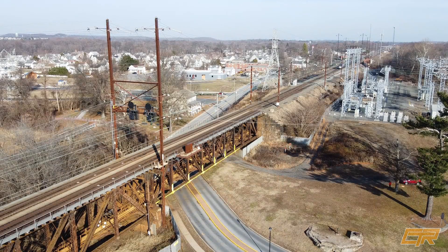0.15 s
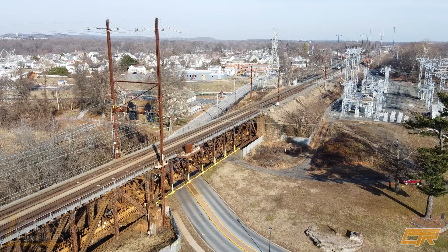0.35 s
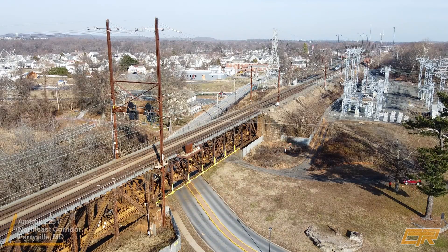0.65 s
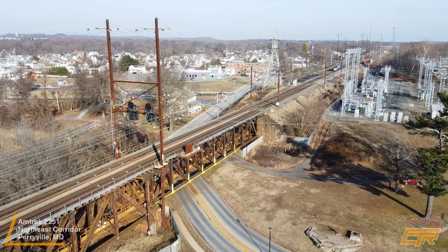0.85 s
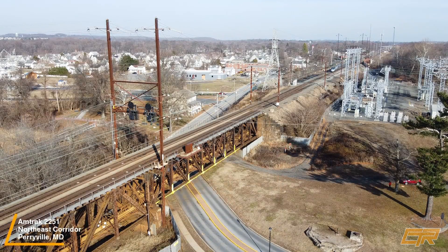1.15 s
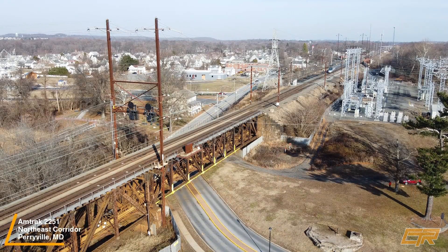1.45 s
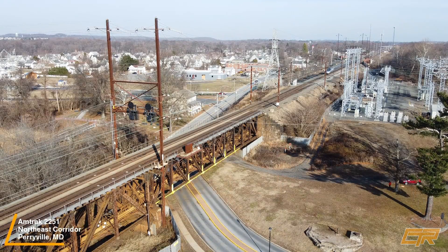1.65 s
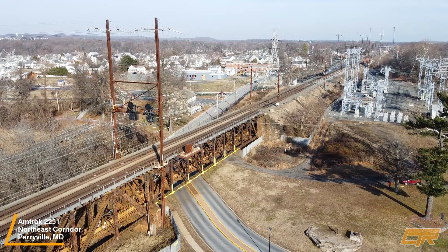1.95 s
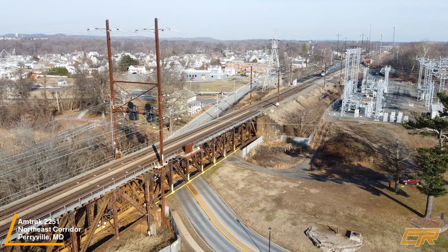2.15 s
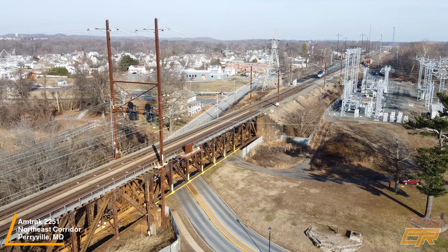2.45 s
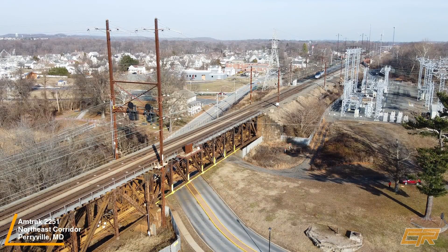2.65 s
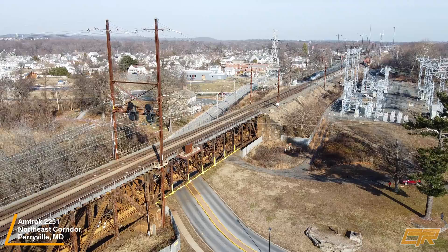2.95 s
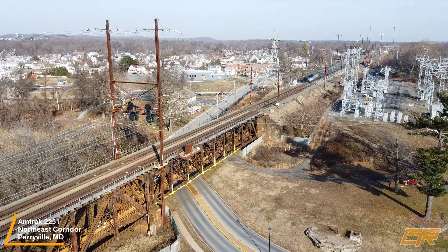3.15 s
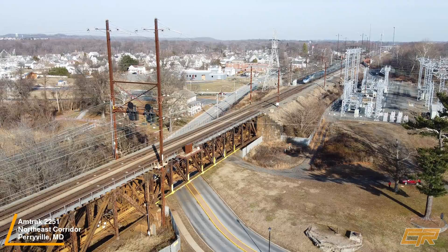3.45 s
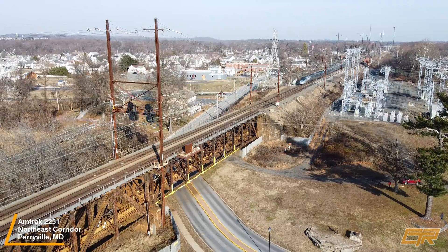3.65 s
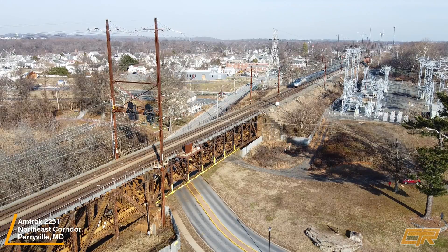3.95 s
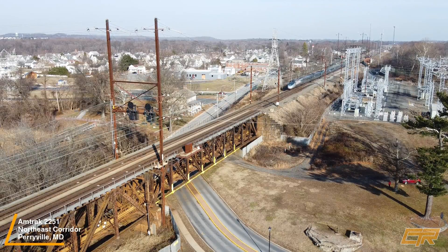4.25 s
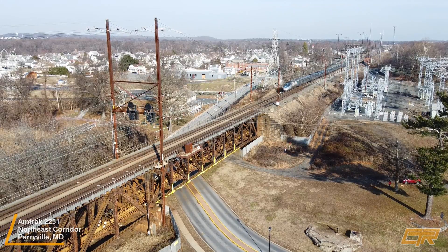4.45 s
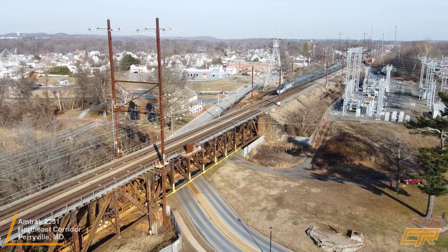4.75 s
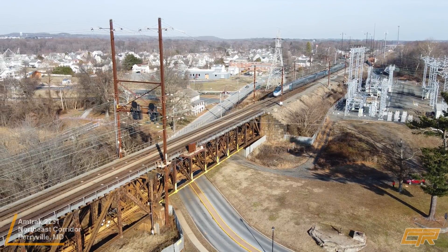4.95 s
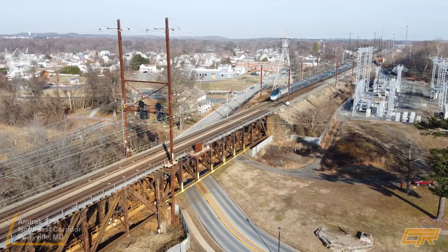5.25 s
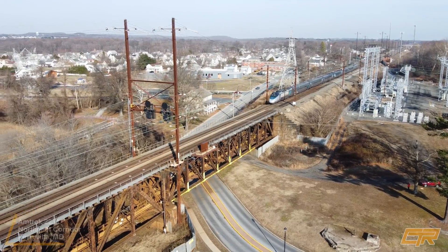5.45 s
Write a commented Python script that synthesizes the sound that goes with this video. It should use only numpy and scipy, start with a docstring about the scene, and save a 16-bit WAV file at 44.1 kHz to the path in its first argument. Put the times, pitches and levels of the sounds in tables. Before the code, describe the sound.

A stereo outdoor scene of about 5.6 seconds beside a steel railway bridge. It starts quietly with broadband town noise, a faint steady hum, low uneven wind buffeting and faint rail rush. Tiny gliding chirps scatter through the first three seconds; thin, fast-trilled whistles stand out at 0.7-1.0 and 2.8-3.0, with faint echoes. A distant lorry engine rises in pitch from about 1 to 2.5 seconds, drops with a gear change near 3, then pulls again around 3.6. Dry, dull knocks with a thin crack come from the left at 2.0-2.1. The train's rolling roar swells throughout, becoming louder and brighter. From about 3.6 the bridge begins drumming deeply, with irregular soft, low thuds from 3.9 onward, left of centre. A faint gear whine sits inside the rush. From 4.6 the power car's heavy low-mid roar joins, surging sharply at the end without passing or fading.

```python
"""Beside a steel railway bridge, below a stereo microphone: a fast train nears from the right and rolls on.
Wheels and rails roar as coloured noise, brighter as less air lies between; girders drum and thud
under the axles, dry knocks come from the track side, and the power car's noise closes in last.
Wind rumbles as low noise, a lorry engine revs far off in gliding orders,
small birds call in trilled and gliding whistles over the noise and hum of a town."""
import sys
import numpy as np
from scipy import signal
from scipy.fft import rfft, irfft, next_fast_len
from scipy.io import wavfile
from scipy.ndimage import uniform_filter1d, map_coordinates

SR = 44100
rng = np.random.default_rng(int(sys.argv[2]) if len(sys.argv) > 2 else 0)


def inscribe(sig):
    """Save sig as 16-bit PCM at rate SR to the path in sys.argv[1].

    A 1-D sig is mono; a 2-D sig holds one channel per row.
    Samples are clipped to [-1, 1] before scaling.
    """
    pcm = np.round(np.clip(np.atleast_2d(sig).T, -1, 1) * 32767)
    wavfile.write(sys.argv[1], SR, pcm.astype(np.int16))


N = 246519


def undb(db):
    """Decibels to gain."""
    return 10 ** (np.asarray(db) / 20)


def pan_gains(pan_db):
    """Left and right gains for a left-minus-right level difference."""
    return undb([[pan_db / 2], [-pan_db / 2]])


def along(table):
    """Columns of a curve table at every sample."""
    knots_s, *columns = np.transpose(table)
    return [np.interp(np.arange(N) / SR, knots_s, column) for column in columns]


def rise(at_s, width_s):
    """A smooth step from 0 to 1."""
    return .5 + .5 * np.tanh((np.arange(N) / SR - at_s) / width_s)


def waver(rate_hz):
    """Random wandering of spread 1, smoothed twice over 1 / rate_hz."""
    width = int(SR / rate_hz)
    x = uniform_filter1d(uniform_filter1d(rng.standard_normal(N), width), width)
    return x / x.std()


def noise(colour):
    """Two-channel noise of a given colour, side and likeness; the mean of both has rms 1."""
    size = next_fast_len(N)
    log_hz = np.log(np.fft.rfftfreq(size, 1 / SR) + 1)
    knots_hz, *columns = np.transpose(colour)
    db, pan_db, like, lead_rad = (np.interp(log_hz, np.log(knots_hz), column) for column in columns)
    like = np.clip(like, 0, 1)
    shared, other = rfft(rng.standard_normal((2, size)))
    right = like * np.exp(-1j * lead_rad) * shared + np.sqrt(1 - like ** 2) * other
    spectra = np.array([shared * undb(db + pan_db / 2), right * undb(db - pan_db / 2)])
    x = irfft(spectra, size)[:, :N]
    return x / np.std(x.mean(axis=0))


def through_air(x, loss_db, flicker_db, steep):
    """Treble dies with distance; eddies make neighbouring bands flicker together."""
    hz, frame_s, bins = signal.stft(x, SR, nperseg=512)
    air = (hz[:, None] / 5000) ** steep
    # at grazing angles the ground's echo cancels the low middle
    ground = 0.4 * np.exp(-(np.log2((hz[:, None] + 1) / 500) / 0.63) ** 2)
    loss = np.interp(frame_s, np.arange(N) / SR, loss_db) * (air + ground)

    eddies = rng.standard_normal((8, len(frame_s)))
    eddies = uniform_filter1d(uniform_filter1d(eddies, size=8), size=2, axis=0)
    octave = np.clip(np.log2(hz / 125 + 1), 0, 7)
    grid = np.meshgrid(octave, np.arange(len(frame_s)), indexing="ij")
    eddies = map_coordinates(eddies / eddies.std(), grid, order=1)
    return signal.istft(bins * undb(flicker_db * eddies - loss), SR, nperseg=512)[1][:, :N]


def add(out, at_s, x, pan_db):
    """Mix a short sound in at a given time."""
    i = int(at_s * SR)
    x = x[:N - i]
    out[:, i:i + len(x)] += x * pan_gains(pan_db)


def town():
    """Flickering broadband noise of a town, with a steady-pitched hum of wavering level."""
    # town noise: (frequency [Hz], level [dB], left minus right [dB], likeness [0-1], left lead [rad])
    town_colour = [(40, -4.5, -3, 0.73, -0.34), (100, -11, 0.5, 0.66, -0.045), (199, -18, -2, 0.39, -0.49),
                   (413, -21.5, 3, 0.21, -0.34), (730, -30.5, 9.5, 0.23, -.1), (1060, -20.5, -3, 0.43, -.1),
                   (1220, -28, -1, 0.23, -.1), (1940, -25, -7, 0.14, -0.056), (3240, -44.5, -1, 0.16, -.2),
                   (5200, -56.5, 6, 0.16, -.3), (7000, -61.5, 4, 0.39, -.1), (16000, -73.5, -3, 0.97, -.1)]
    town_db, hum_hz, hum_db = -46, 306, -68
    rush = undb(town_db) * through_air(noise(town_colour), np.zeros(N), flicker_db=0.7, steep=1)
    hum = undb(hum_db + 2.8 * waver(4)) * np.sin(2 * np.pi * hum_hz * np.arange(N) / SR)
    return rush + hum * pan_gains(6)


def wind():
    """Low buffeting, its own swells partly evened out, that follows the gusts."""
    # buffeting: (frequency [Hz], level [dB], left minus right [dB], likeness [0-1], left lead [rad])
    wind_colour = [(10, -3, 2, 1, .1), (25, 4.5, 1.8, 0.91, .1), (42.3, 3.5, 1.6, 1, .1),
                   (64, -8.5, 2, 1, .1), (105, -19, 1.8, 0.83, .1), (300, -71, 0.9, 1, .1),
                   (3000, -130, 1.8, .9, .1)]
    # gusts, level applied to the evened noise: (time [s], level [dB])
    gusts = [(0.0, -47.5), (0.48, -37.5), (1.52, -41), (1.57, -35.5), (1.98, -32.5), (2.15, -39.5),
             (2.79, -32.5), (2.99, -41.5), (3.14, -31.5), (3.28, -46.5), (3.36, -30.5), (3.67, -39),
             (4.61, -44), (4.67, -35), (4.79, -41), (5.4, -36.5), (5.48, -28.5), (5.59, -35)]
    x = noise(wind_colour)
    swell = np.sqrt(uniform_filter1d(x.mean(axis=0) ** 2, SR // 12)) + 0.05
    return undb(along(gusts)[0]) * x / swell ** 0.28


def far_birds(count=14):
    """Gliding chirps, listed and scattered at random, blurred by the trees between."""
    # far chirps: (time [s], length [s], first pitch [Hz], last pitch [Hz], level [dB])
    chirps = [(.037, .015, 4500, 3900, -74), (.37, .03, 7600, 7750, -88), (0.082, .05, 3700, 3750, -76),
              (.19, .04, 3710, 3650, -81), (0.454, .05, 3800, 3600, -81), (.49, .03, 5960, 5600, -82),
              (.805, .025, 4900, 4850, -77), (0.899, .025, 3600, 3600, -74), (1.13, 0.093, 5300, 5970, -79),
              (1.615, 0.064, 6000, 5450, -83), (1.86, .06, 5320, 4250, -72),
              (2.441, 0.045, 7350, 7900, -84), (2.621, 0.078, 6300, 6700, -85),
              (2.68, .025, 7800, 7500, -80), (2.72, .025, 7600, 8000, -81), (2.986, .07, 7800, 8040, -79)]
    scatter = [(3.2 * a, .02 + .04 * b, 3600 + 4200 * c, 3200 + 4200 * c + 800 * d, -80 - 9 * c)
               for a, b, c, d in rng.random((count, 4))]
    out, flutter = np.zeros((2, N)), waver(120)
    tail_s = np.arange(SR // 10) / SR
    for at_s, length_s, first_hz, last_hz, db in [*chirps, *scatter]:
        rough = flutter[int(at_s * SR):][:int(length_s * SR)]
        hz = np.linspace(first_hz, last_hz, len(rough)) + 60 * rough[::-1]
        whistle = np.sin(2 * np.pi * np.cumsum(hz) / SR)
        x = np.sqrt(2) * undb(db + 2.1 * rough) * whistle * signal.windows.tukey(len(hz), .4)
        blur = rng.standard_normal(len(tail_s)) * np.exp(-tail_s / .02)
        add(out, at_s, x, pan_db=-2.0)
        add(out, at_s, signal.fftconvolve(x, blur) * undb(-30), pan_db=.1)
    return out


def near_bird():
    """Thin whistles with a fast trill, a smear from the trees and one echo."""
    # calls, each a list of: (time [s], pitch [Hz], level [dB], trill depth either way [Hz])
    near_calls = [
        [(.7, 8600, -85, 300), (.712, 8850, -73, 400), (.725, 9350, -63, 750), (.755, 9240, -65, 650),
         (.778, 9440, -57, 300), (.79, 9000, -59, 503), (.8, 8800, -75, 500)],
        [(.838, 7760, -85, 100), (.848, 8400, -73, 150), (.862, 8300, -71, 180), (.898, 8720, -68, 120),
         (.994, 9200, -71, 220), (1.003, 8900, -80, 300)],
        [(2.78, 8600, -88, 150), (2.796, 9190, -76, 200), (2.836, 9460, -71.5, 170), (2.968, 9000, -67.5, 201),
         (2.992, 8900, -71, 248.6)],
    ]
    trill_hz, echo_s, echo_db = 200, .218, -19
    out, flutter = np.zeros((2, N)), waver(120)
    tail_s = np.arange(SR // 4) / SR
    for call in near_calls:
        knots_s, *columns = np.transpose(call)
        start_s = knots_s[0]
        t = np.arange(start_s, knots_s[-1], 1 / SR)
        hz, db, depth_hz = (np.interp(t, knots_s, column) for column in columns)
        rough = flutter[int(start_s * SR):][:len(t)]
        beats = np.cumsum(trill_hz * (1 + .08 * rough)) / SR
        # each beat of the trill rises quickly, then slides down
        sweep = signal.sawtooth(2 * np.pi * beats, .2)
        level_db = db + 2.1 * rough - 4.1 * np.cos(2 * np.pi * beats)
        whistle = np.sin(2 * np.pi * np.cumsum(hz + depth_hz * sweep) / SR)
        x = np.sqrt(2) * undb(level_db) * whistle * signal.windows.tukey(len(t), .1)
        trees = rng.standard_normal(len(tail_s)) * np.exp(-tail_s / .05)
        add(out, start_s, x, pan_db=4)
        add(out, start_s, signal.fftconvolve(x, trees) * undb(-39), pan_db=1.5)
        add(out, start_s + echo_s, undb(echo_db + 3.6 * flutter[-len(t):]) * x, pan_db=-2.0)
    return out


def lorry(pan_db=2.0):
    """Engine orders glide with the crank speed and waver on the way; the exhaust roars under them."""
    # speeding up, changing gear, pulling again: (time [s], strongest line [Hz], its level [dB])
    revs = [(0, 87.6, -78), (.9, 94.4, -59), (1.4, 104.5, -54.5), (1.93, 120.3, -50), (2.55, 134.2, -52.5),
            (2.75, 127.2, -59), (3, 104.2, -66), (3.4, 99.1, -57), (3.6, 100, -48), (3.85, 101, -80)]
    # engine orders: (multiple of the strongest line, level relative to it [dB])
    orders = [(4 / 5, -11), (1, 0), (6 / 5, -7), (9 / 5, -7.5)]
    # exhaust: (frequency [Hz], level [dB], left minus right [dB], likeness [0-1], left lead [rad])
    exhaust_colour = [(50, -6.5, 2, 0.6, -.1), (99, -1, 2, 0.69, -.2), (176, 1.5, 2.5, 0.57, -0.16),
                      (298, -4.5, 2.5, 0.21, -.1), (442, -21.5, 2.5, .3, -.1), (900, -41, 1.3, 0.34, -.1),
                      (5000, -110, 2.5, .3, -.1)]
    roar_db, nearest_s, span_s = -52, 2.64, 2.3
    hz, db = along(revs)
    turns = np.cumsum(hz) / SR
    tone = np.zeros(N)
    for multiple, order_db in orders:
        phase_turns = multiple * turns + 0.056 * waver(3.6) + rng.random()
        tone += undb(order_db + 2.1 * waver(7.5)) * np.sin(2 * np.pi * phase_turns)
    # the roar swells and fades as the lorry goes by
    roar = undb(roar_db) / (1 + ((np.arange(N) / SR - nearest_s) / span_s) ** 2)
    return np.sqrt(2) * undb(db) * tone * pan_gains(pan_db) + roar * noise(exhaust_colour)


def knocks():
    """Short bursts from the track side ring a dull body, with a thin crack on top."""
    # dry knocks: (time [s], body peak level [dB], crack relative to body [dB], burst length [s])
    knock_list = [(1.9838, -30, -29, .0015), (2.078, -37, -18, .004), (2.082, -37, -19, .003),
                  (2.0935, -36, -16, .004), (2.099, -37, -15, .0025), (2.128, -38, -24, .0025)]
    out, t = np.zeros((2, N)), np.arange(SR // 25) / SR
    body = signal.butter(3, [680, 1650], "band", fs=SR, output="sos")
    crack = signal.butter(6, [2400, 5700], "band", fs=SR, output="sos")
    for at_s, db, crack_db, length_s in knock_list:
        burst = rng.standard_normal(len(t)) * t * np.exp(-2 * t / length_s)
        low, high = signal.sosfilt(body, burst), signal.sosfilt(crack, burst)
        x = low / abs(low).max() + undb(crack_db) * high / abs(high).max()
        add(out, at_s, undb(db) * x, pan_db=-9)
    return out


def thuds(rise_s=0.0049, t60_s=0.083):
    """An axle's soft push sets a girder swinging for some cycles."""
    # axles drop onto the girders: (time [s], envelope peak level [dB], pitch [Hz])
    axles = [(3.881, -27.5, 144), (3.952, -29.5, 177), (4.026, -30.5, 162), (4.149, -25, 144),
             (4.24, -30, 169), (4.453, -30.5, 127), (4.84, -30, 114), (4.909, -26.5, 129),
             (5.055, -27, 145), (5.22, -29, 203), (5.512, -25, 247)]
    out, t = np.zeros((2, N)), np.arange(SR // 5) / SR
    shape = (1 - np.exp(-t / rise_s)) * np.exp(-np.log(1000) * t / t60_s)
    shape /= shape.max()
    for (at_s, db, hz), turn in zip(axles, rng.random(len(axles))):
        add(out, at_s, undb(db) * shape * np.sin(2 * np.pi * (hz * t + turn)), pan_db=-13.5)
    return out


def train():
    """Rolling noise from afar, the bridge drumming once the wheels are on it, the power car last."""
    # rolling noise as the train nears: (time [s], level [dB])
    approach = [(0, -56.5), (.7, -54.5), (1.6, -50.5), (2.4, -45.5), (3.2, -40), (4.1, -33.5), (4.9, -32.5),
                (5.4, -31.5), (5.59, -27.5)]
    # brief brightenings of the rush: (time [s], level change [dB], air loss removed [dB])
    brightenings = [(5.206, 0.5, 3), (5.5, -1, 2)]
    # wheels and rails: (frequency [Hz], level [dB], left minus right [dB], likeness [0-1], left lead [rad])
    rolling_colour = [(60, -39, -11, .3, .1), (252, -18, -4, 0.86, -0.29), (460, -4.5, -3.5, 0.04, -0.54),
                      (700, -1.5, -10.5, 0.48, -0.52), (907, -2, -10.5, 0.51, -0.36),
                      (1580, -7, -8.5, 0.5, -0.61), (1995, -7, -5, 0.32, -0.41),
                      (2330, -12.5, -8, 0.4, -0.42), (3890, -19, -7.5, 0.06, -0.64),
                      (5100, -23.5, -1.5, 0.77, 0.21), (6228, -31, -7.5, 0.2, -0.039),
                      (8600, -34, -5.5, 0.9, -.1), (10360, -38, -1, 1, -0.042), (13000, -50, 1, 1, -.1),
                      (16000, -64, -3, .9, -.1)]
    # girders: (frequency [Hz], level [dB], left minus right [dB], likeness [0-1], left lead [rad])
    girder_colour = [(29.6, -29, 13, 0.95, .4), (59.5, 2.5, -9.5, 1, 1), (127, 2, -4, 0.69, 1),
                     (235, -2, -8.5, 0.37, 0.46), (356, -5, -5.5, 0.1, 0.58), (513, -8, -10.5, 0.86, 0.096),
                     (804, -15, -19, 0.59, 0.093), (1480, -59, 14, 0.93, .1), (8000, -110, -10, .5, .1)]
    # power car: (frequency [Hz], level [dB], left minus right [dB], likeness [0-1], left lead [rad])
    car_colour = [(30, -9, -5, 0.77, .3), (60, 3, -5, 0.61, 0.43), (241, -3.5, -11, 0.56, 0.33),
                  (348, -11.5, -10, 0.89, 0.18), (492, 2.5, -13, 0.3, 0.09), (717, 0.5, -8, 0.92, .1),
                  (960, -38, -1, 0.46, .1), (2000, -42, -2, 0.84, .1), (8000, -110, -10, .7, .1)]
    # girder drumming relative to the rolling noise, before and after the wheels reach the bridge
    drum_far_db, drum_on_db, bridge_s, bridge_rise_s = -12.5, -2, 3.61, 0.26
    # air loss at 5 kHz: steady, a step down as the train comes into the open, then a steady shrinking
    far_loss_db, open_db, open_s, open_rise_s = 10, 4, 3.78, 0.15
    loss_shrinks_s, shrink_db_per_s = 4.6, 5.5
    # power car: level at one second's travel; it passes aside by this many seconds' travel
    car_db, abeam_s, aside_s, car_heard_s, car_rise_s = -43, 5.724, 0.045, 4.64, 0.11
    whine_hz, whine_db, brightening_s = 2247, -23, 0.04  # gear whine is relative to the rolling noise

    t = np.arange(N) / SR
    roll_db, = along(approach)
    drum_db = roll_db + drum_far_db + (drum_on_db - drum_far_db) * rise(bridge_s, bridge_rise_s)
    loss_db = far_loss_db - open_db * rise(open_s, open_rise_s)
    loss_db = loss_db - shrink_db_per_s * np.maximum(t - loss_shrinks_s, 0)
    for at_s, change_db, clearer_db in brightenings:
        bump = np.exp(-((t - at_s) / brightening_s) ** 2)
        roll_db = roll_db + change_db * bump
        loss_db = loss_db - clearer_db * bump
    # steady speed: level goes as one over distance
    car = undb(car_db) * rise(car_heard_s, car_rise_s) / np.hypot(t - abeam_s, aside_s)
    whine = np.sin(2 * np.pi * np.cumsum(whine_hz + 12 * waver(15.3)) / SR)
    whine = whine * undb(whine_db + 1.4 * waver(6.7)) * pan_gains(-8)
    rolling = through_air(noise(rolling_colour) + whine, loss_db, flicker_db=1.0, steep=1.16)
    return undb(roll_db) * rolling + undb(drum_db) * noise(girder_colour) + car * noise(car_colour)


def scene():
    """Everything that reaches the two capsules."""
    background = town() + wind() + far_birds() + near_bird() + lorry()
    return background + knocks() + thuds() + train()


def record(dry):
    """A faint hiss, nearly alike on both channels, and a steep top cut."""
    hiss_db, top_hz = -77, 15720
    hiss = rng.standard_normal(N) + .12 * rng.standard_normal((2, N))
    top_cut = signal.ellip(10, .2, 80, top_hz, fs=SR, output="sos")
    return signal.sosfilt(top_cut, dry + undb(hiss_db) * hiss)


dry = scene()
out = record(dry)
inscribe(out)
```